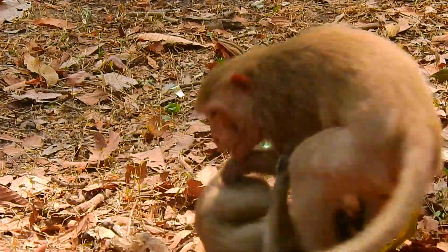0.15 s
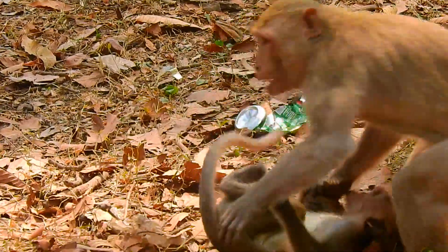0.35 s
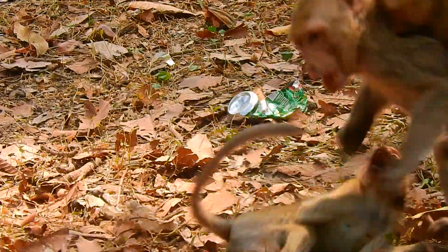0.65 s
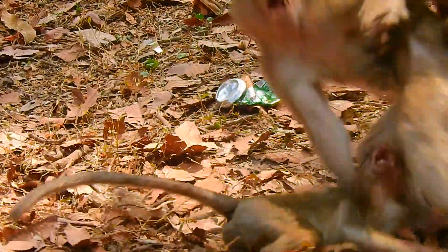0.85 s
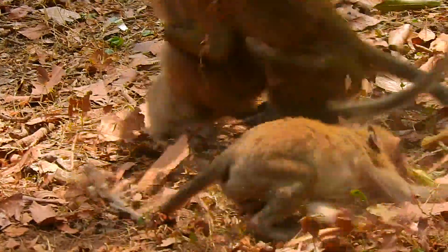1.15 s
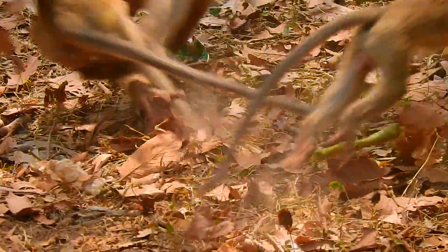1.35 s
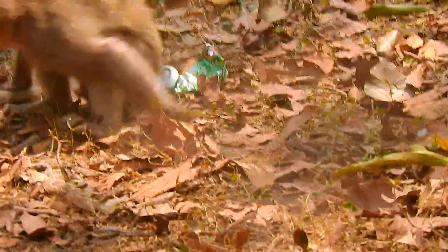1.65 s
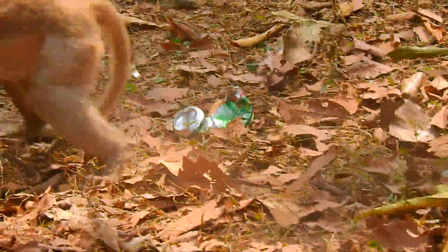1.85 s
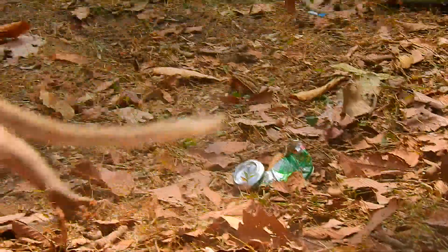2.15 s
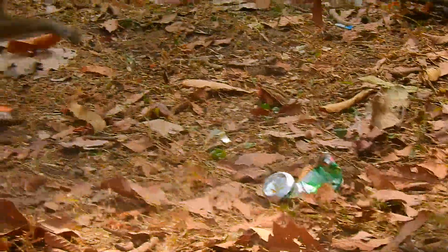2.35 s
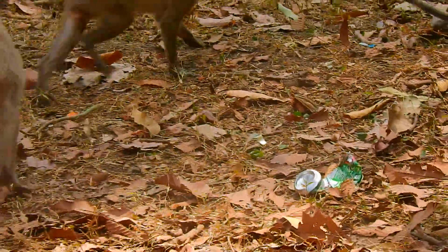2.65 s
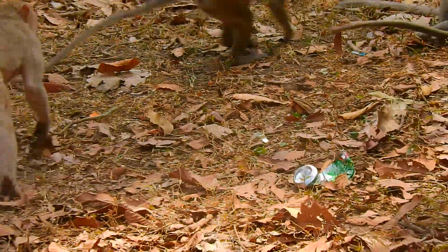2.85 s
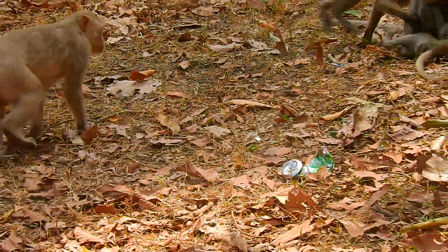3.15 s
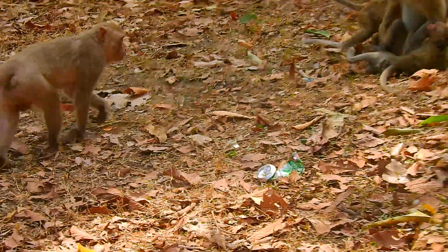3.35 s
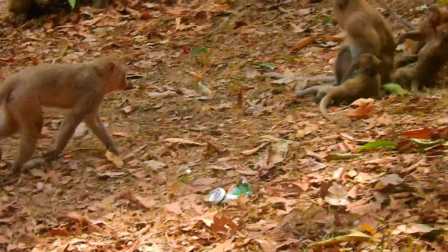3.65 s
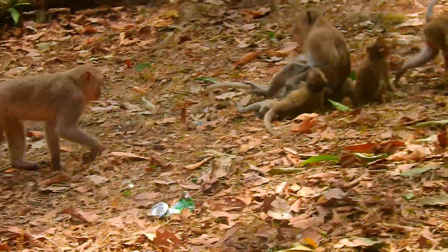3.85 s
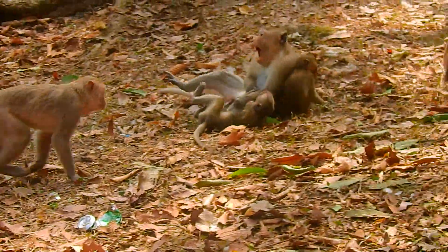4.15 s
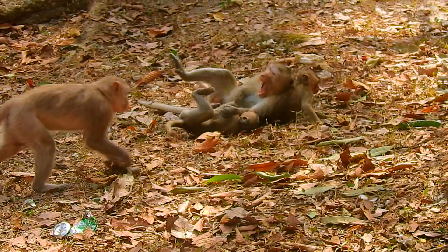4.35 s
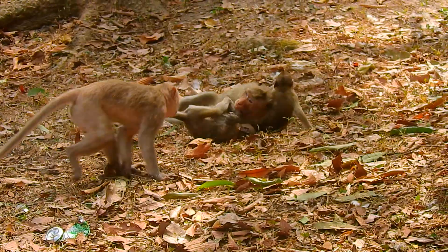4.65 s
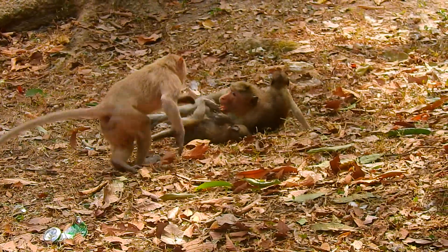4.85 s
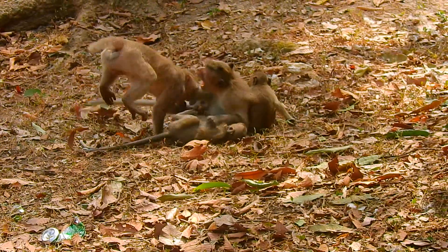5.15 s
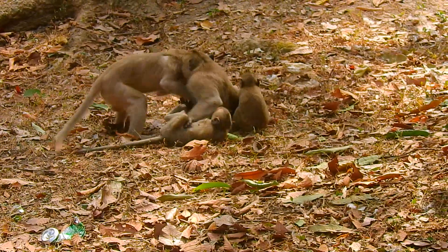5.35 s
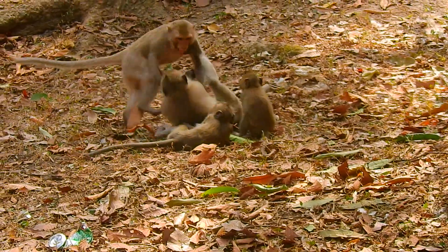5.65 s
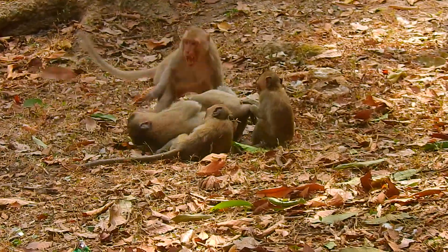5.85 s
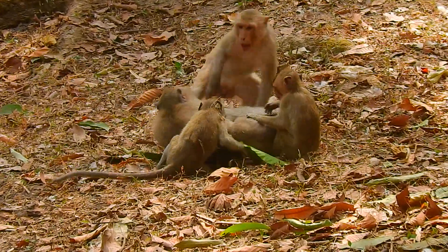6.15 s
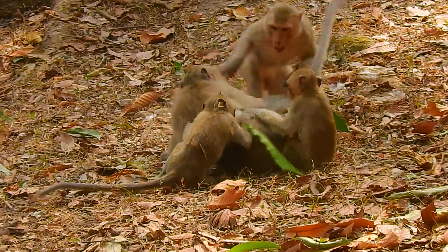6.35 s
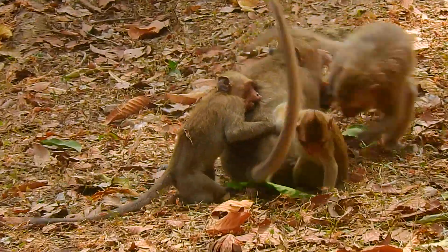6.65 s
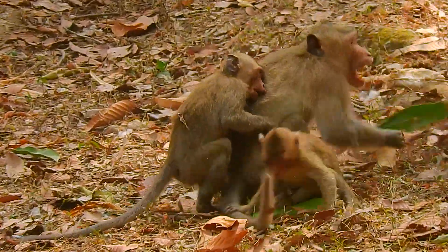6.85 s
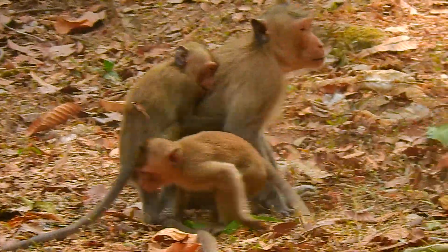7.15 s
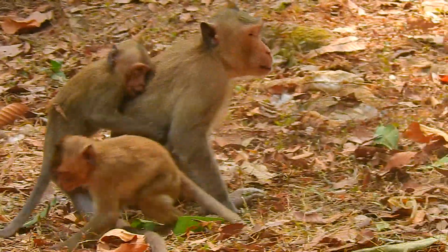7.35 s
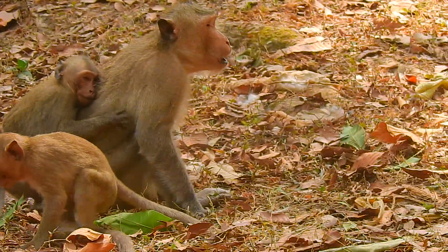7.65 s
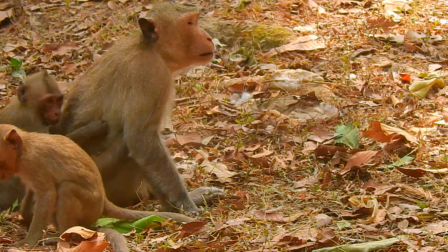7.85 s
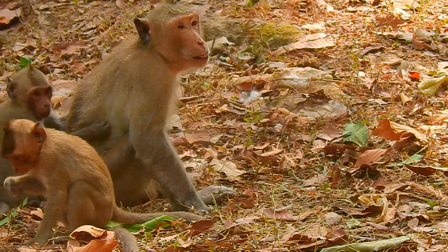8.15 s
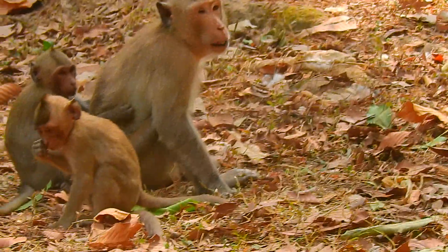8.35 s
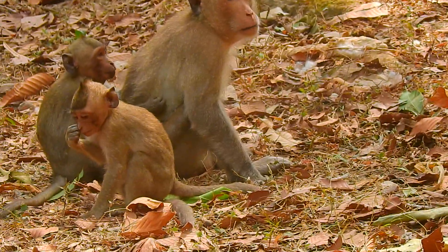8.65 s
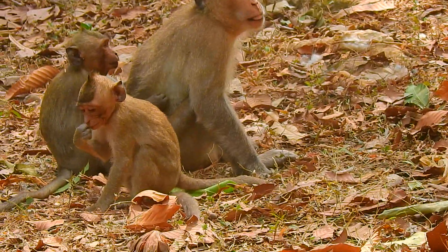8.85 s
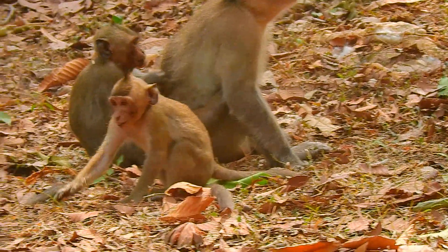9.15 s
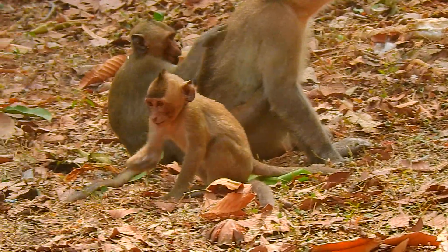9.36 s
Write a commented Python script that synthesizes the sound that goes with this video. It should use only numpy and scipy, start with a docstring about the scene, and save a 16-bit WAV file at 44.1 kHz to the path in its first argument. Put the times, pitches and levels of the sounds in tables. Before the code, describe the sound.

A loud steady cicada chorus fills dry woodland while monkeys scuffle in dead leaves, then a distant motorbike blips and a nearer cicada throbs.

```python
"""A cicada chorus drones in dry woodland: tymbal clicks of many singers, blurred and coloured.
A nearer singer, an amplitude-modulated buzz, joins about halfway and throbs ever quicker.
Monkeys tumble in dead leaves (noise bursts and grains); a far motorbike blips its throttle (pulses
through exhaust resonances) beside an idling engine (harmonics) and road noise. The hand-held camera
adds lever clicks, a zoom-motor whine and a treble path that arrives late."""
import sys
import numpy as np
from scipy import signal
from scipy.fft import rfft, irfft
from scipy.io import wavfile
from scipy.ndimage import uniform_filter1d

SR = 44100
rng = np.random.default_rng(int(sys.argv[2]) if len(sys.argv) > 2 else 0)


def to_wav(s):
    """Save 16-bit WAV."""
    ch = np.atleast_2d(s).T  # columns
    pcm = np.round(np.clip(ch, -1, 1) * 32767)  # PCM
    wavfile.write(sys.argv[1], SR, pcm.astype(np.int16))


N = 419832
T = np.arange(N) / SR
HZ = np.fft.rfftfreq(N, 1 / SR)


# Levels of the low-voiced and high-voiced singers: time_s, low_db, high_db
CHORUS_LEVELS = [(0, -25.5, -22), (1.2, -25.5, -23), (3, -25.5, -24), (4.3, -25.5, -23.5),
                 (5.4, -25, -23.5), (7.4, -25, -22.5), (9.52, -25.5, -22.5)]
# Spectrum of the song common to both ears: frequency_hz, density_db (relative, per Hz)
SONG_SPECTRUM = [(1250, -33.5), (1740, -7), (1900, -12), (2400, -22), (2920, -12.5), (3400, 2), (3750, -1),
                 (4050, -7.5), (4560, -8), (5160, -7), (7120, -6.5), (8400, -19), (9320, -30.5),
                 (15500, -55)]
# Spectrum of what differs left and right: frequency_hz, density_db (relative, per Hz)
SONG_SIDE_SPECTRUM = [(1300, -36), (1720, -12), (2070, -18), (2470, -28), (2800, -15.5), (3480, -3),
                      (4370, -9.5), (7040, -1), (8060, -8.5), (9420, -24.5), (13000, -35), (15500, -54)]
VOICE_SPLIT_HZ = 4300


def chorus():
    """Superposition: two bands of a blurred crowd of clicks swell and flicker independently."""
    mid = crowd(count=16) * colour(SONG_SPECTRUM)
    side = crowd(count=16) * colour(SONG_SIDE_SPECTRUM) * undb(-7.5)
    low_share = 1 / (1 + (HZ / VOICE_SPLIT_HZ) ** 12)
    out = 0
    for share, level_db in zip((low_share, 1 - low_share), columns(CHORUS_LEVELS)):
        mid_band, side_band = irfft(mid * share, N), irfft(side * share, N)
        flicker_db = .3 * walk(8.0) + .5 * walk(18.0)
        ears = np.array([mid_band + side_band, mid_band - side_band]) / np.std(mid_band)
        out = out + undb(level_db + flicker_db) * ears
    return out


def crowd(count):
    """Multiple scattering: trunks and leaves blur the uneven tymbal clicks; returns a spectrum."""
    clicks = np.zeros(N)
    for click_hz in rng.uniform(190, 330, count):
        intervals = SR / click_hz * (1 + .15 * rng.standard_normal(N // 120))
        at = np.cumsum(intervals).astype(int)
        clicks[at[at < N]] += rng.choice([-1, 1])
    blur = rng.standard_normal(N) * np.exp(-T / .5)
    # only the phase of the decaying noise is used, so the magnitudes stay those of the clicks
    return rfft(clicks) * np.exp(1j * np.angle(rfft(blur)))


# Body resonances of the near singer: frequency_hz, width_hz, level_db
SINGER_MODES = [(5200, 1300, -8), (6500, 1100, 0), (7300, 1100, -2), (8050, 1000, -4), (9600, 1000, -22),
                (11300, 1200, -28), (13000, 1000, -33), (14500, 1200, -41)]
# one throb peaks at THROB_S; the rate of throbs there, and how steadily it quickens
THROB_S, THROB_HZ, QUICKEN_HZ_PER_S = 4.767, 5.03, .575
THROB_SCATTER_DB = .7
# base level before the throb acts on it; the song starts below it and warms up
SINGER_START_S, SINGER_DB, START_BELOW_DB, WARM_UP_S = 4.25, -30, 16, 0.48


def singer():
    """Amplitude modulation: a click buzz swells once a throb as the abdomen pumps, ever quicker."""
    since = T - THROB_S
    throbs = THROB_HZ * since + QUICKEN_HZ_PER_S * since ** 2 / 2
    swell = (.5 + .5 * np.cos(2 * np.pi * throbs)) ** 2.2
    sung_s = np.clip(T - SINGER_START_S, 0, None)
    level_db = SINGER_DB - START_BELOW_DB * np.exp(-sung_s / WARM_UP_S) + THROB_SCATTER_DB * walk(6.0)
    gain = undb(level_db) * (0.32 + 1.55 * swell) * np.clip(sung_s / .2, 0, 1)
    click_turns = np.cumsum(262 * (1 + .03 * walk(3.0))) / SR  # about 262 clicks a second
    click_gate = 0.59 + np.exp(-(click_turns % 1) / .3)
    body = resonances(SINGER_MODES, order=3)
    # each click is a rattle of ribs; scattering makes it differ between the ears
    both, left, right = (unit(through(click_gate * rng.standard_normal(N), body)) for _ in range(3))
    return gain * (.7 * both + .7 * np.array([left, right]))


# Paws and bodies landing in leaves: start_s, peak_db, pitch_hz, crackle_peak_db
LANDINGS = [(0.247, -35, 1010, -35), (0.284, -30.5, 1080, -33), (0.529, -34, 735, -29),
            (0.636, -26.5, 800, -26), (0.724, -32, 1000, -25), (0.859, -34, 956, -32),
            (0.927, -28, 929, -39), (0.978, -35, 501, -31), (1.19, -30, 1170, -24), (1.33, -34, 727, -37),
            (1.408, -20, 1150, -30), (1.443, -32, 1240, -26), (1.549, -22, 1220, -32),
            (1.597, -36, 624, -34), (1.695, -39, 560, -23), (5.242, -35.5, 1300, -41),
            (7.259, -33, 1300, -40), (8.297, -38, 880, -41), (8.376, -36, 530, -40), (8.535, -36, 859, -40),
            (9.384, -34, 1090, -40)]
# Leaves shuffled as the monkeys tumble and run off: time_s, level_db
RUSTLE_LEVELS = [(0, -55), (.3, -42), (1.8, -44.5), (2.3, -48), (2.8, -57)]
# Spectrum of crushed leaf: frequency_hz, density_db (relative, per Hz)
LEAF_SPECTRUM = [(300, -22), (600, -3.5), (1200, -8), (4000, -5), (9000, -2), (15000, -31)]
PAW_S = 0.034  # time for a landing to fall 20 dB


def monkeys():
    """Impact and granular noise: dull landings with a crackle on top, over grains of crushed leaf."""
    landings = np.zeros(N)
    for start_s, peak_db, pitch_hz, crackle_db in LANDINGS:
        add(landings, start_s, peak_db, pitch_hz / 1.71, pitch_hz * 1.72, PAW_S)
        add(landings, start_s, crackle_db, 5000, 10500, PAW_S)
    present = rng.random(N) < .05
    grain_db = 2.5 * rng.exponential(size=N) + 3.5 * walk(14.0)
    grains = rng.standard_normal((2, N)) * present * undb(grain_db)
    shared = 3.0 * grains.sum(axis=0)
    leaves = [unit(through(ear + shared, colour(LEAF_SPECTRUM))) for ear in grains]
    rustle_db = np.interp(T, *np.transpose(RUSTLE_LEVELS), right=-120)
    return landings + np.array(leaves) * undb(rustle_db)


# Exhaust resonances, throttle shut: frequency_hz, width_hz, level_db
SHUT_MODES = [(106.3, 101, 0), (210, 90, -33)]
# Exhaust resonances, throttle open: frequency_hz, width_hz, level_db
OPEN_MODES = [(80, 50, -12), (140, 95, 0), (230, 80, -12), (300, 70, -20)]
# Motorbike blips: first_firing_s, end_s
BLIP_TIMES = [(3.266, 3.9), (4.896, 5.52), (5.84, 7.6), (7.657, 8.75)]
# Strength of a fast firing in each blip: level_db
BLIP_LEVELS = [-23, -24.5, -24, -24]
TICK_OVER_HZ = 13  # firing rate with the throttle shut
SLOW_LOSS_DB, SLOW_SPAN_HZ = 8, 1.9  # firings weaken near tick-over


def motorbike():
    """Source and filter: a pulse per firing rings the exhaust, deeper when the throttle shuts."""
    shut, wide = 0, 0
    for (first_s, end_s), blip_db in zip(BLIP_TIMES, BLIP_LEVELS):
        firing_hz, opening = revs(first_s, end_s)
        # the count starts just short of a whole number, so the first firing comes at once
        turns = np.cumsum(firing_hz * (T >= first_s - .01)) / SR + .999
        level_db = blip_db - SLOW_LOSS_DB * np.exp(-(firing_hz - TICK_OVER_HZ) / SLOW_SPAN_HZ)
        fired = pulses(turns, scatter_db=1.0) * undb(level_db) * inside(first_s, end_s, fade_s=0.089)
        shut = shut + fired * (1 - opening)
        wide = wide + fired * opening
    out = 0
    for fired, modes in ((shut, SHUT_MODES), (wide, OPEN_MODES)):
        pipe = resonances(modes, order=3)
        out = out + through(fired, pipe) / np.abs(irfft(pipe, N)).max()
    return out


# Twists of the throttle: time_s, firing_rate_hz (that the engine then heads for)
THROTTLE_TWISTS = [(3.238, 31.4), (3.39, 18.15), (3.59, 14.26), (4.836, 17.54), (5.819, 23.8),
                   (6.151, 27.9), (6.877, 29.17), (7.047, 11.8), (7.731, 30.06), (8.178, 12.14)]
# the exhaust sounds wide open OPEN_SPAN_HZ over tick-over; each lag is applied twice
FLYWHEEL_S, OPEN_SPAN_HZ, GAS_S = .101, 12, 0.033


def revs(first_s, end_s):
    """Inertia: firing rate and exhaust opening (0-1) of a blip lag the twist; open if fast and fed."""
    aim_hz = np.full(N, float(TICK_OVER_HZ))
    for twist_s, target_hz in THROTTLE_TWISTS:
        if first_s - FLYWHEEL_S < twist_s < end_s:
            aim_hz[T >= twist_s] = target_hz
    firing_hz = lagged(aim_hz, FLYWHEEL_S)
    fed_hz = np.minimum(firing_hz, lagged(aim_hz, GAS_S))
    return firing_hz, np.clip((fed_hz - TICK_OVER_HZ) / OPEN_SPAN_HZ, 0, 1)


def lagged(aim_hz, lag_s):
    """First-order relaxation, twice over: follows a firing rate from tick-over."""
    keep = np.exp(-1 / (lag_s * SR))
    pole = [1, -keep]
    rise_hz = signal.lfilter([(1 - keep) ** 2], np.convolve(pole, pole), aim_hz - TICK_OVER_HZ)
    return TICK_OVER_HZ + rise_hz


# Zoom motor, one curve a run: time_s, pitch_hz
ZOOM_RUNS = [
    [(2.5, 825), (2.6, 940), (2.82, 938), (2.9, 975), (3.03, 935), (3.3, 950), (3.48, 967), (3.52, 920)],
    [(6.02, 915), (6.13, 925), (6.2, 978), (6.43, 930), (6.62, 930), (6.775, 983), (6.8, 915), (7.09, 946)],
]
# Level of each run once up to speed: level_db
ZOOM_LEVELS = [-49.5, -53.5]
# Jolts after which the motor hunts about its speed: start_s, swing_hz, length_s
MOTOR_JOLTS = [(2.583, 65, .25), (3.03, 60, .17)]
HUNT_HZ, HUNT_DECAY_S = 14.2, .4
SPIN_UP_S = .14  # time for a rise of 1 in gain; the gain is 0.34 at the start of a run


def zoom():
    """Frequency modulation: a near-sine whine whose pitch rings as a damped swing after each jolt."""
    hunt_hz = 0
    for jolt_s, swing_hz, length_s in MOTOR_JOLTS:
        swing = -swing_hz * np.cos(2 * np.pi * HUNT_HZ * (T - jolt_s))
        decay = np.exp(-np.abs(T - jolt_s) / HUNT_DECAY_S)
        hunt_hz = hunt_hz + swing * decay * (T > jolt_s) * (T < jolt_s + length_s)
    out = 0
    for run, level_db in zip(ZOOM_RUNS, ZOOM_LEVELS):
        start_s, end_s = run[0][0], run[-1][0]
        pitch_hz = columns(run)[0] + hunt_hz + 10.5 * walk(40.0)
        whine = np.sqrt(2) * np.sin(2 * np.pi * np.cumsum(pitch_hz) / SR)
        spin_up = np.clip((T - start_s) / SPIN_UP_S + 0.34, 0, 1)
        gain = undb(level_db + 1.7 * walk(22.0)) * inside(start_s, end_s, fade_s=.03) * spin_up
        out = out + gain * whine
    return out


# Knocks of finger and lever on the camera shell: start_s, peak_db, pitch_hz
SHELL_KNOCKS = [(2.366, -29, 584), (2.42, -26, 999), (3.366, -35, 960), (3.657, -32, 710),
                (3.75, -33.5, 888), (3.795, -29, 800), (5.712, -38, 673), (5.734, -32, 877),
                (5.774, -37, 571), (6.54, -32.5, 931), (6.98, -27, 1250), (7.04, -37, 942)]
KNOCK_S = 0.038  # time for a knock to fall 20 dB


def knocks():
    """Damped impact response: the plastic shell answers each touch with a short dull tick."""
    out = np.zeros(N)
    for start_s, peak_db, pitch_hz in SHELL_KNOCKS:
        add(out, start_s, peak_db, pitch_hz / 1.6, pitch_hz * 1.58, KNOCK_S)
    return out


# Idling engine, uneven and fainter by the end: time_s, level_db
IDLING_LEVELS = [(0, -41), (1.3, -43.5), (2.25, -41.5), (2.7, -49.5), (4.3, -44), (5.6, -46), (7.5, -52),
                 (8.5, -46.5), (9.52, -50.5)]
# Lines of the idling engine: multiple (of the firing rate), level_db (relative)
IDLE_LINES = [(2, -4), (3, -7), (4, 0), (5, -7), (7, -10), (10, -17)]
# Distant road: time_s, rumble_db, tyre_wash_db
ROAD_LEVELS = [(0, -41.5, -44.5), (1.6, -42.5, -48), (2.7, -41.5, -48), (4.9, -41, -53), (5.7, -40, -49.5),
               (7.3, -39, -50.5), (9.52, -44.5, -59)]
# Spectrum of the road rumble: frequency_hz, density_db (relative, per Hz)
RUMBLE_SPECTRUM = [(25, -24), (45, -30), (65, 0), (110, 4), (170, -0.5), (240, -9.5), (400, -51)]
# Spectrum of the tyre wash: frequency_hz, density_db (relative, per Hz)
WASH_SPECTRUM = [(120, -18), (250, 0.5), (420, -4), (520, -8.5), (900, -6), (1400, -8.5), (3000, -40),
                 (9000, -60)]
IDLE_HZ = 40.4  # mean firing rate
HUM_HZ, HUM_DB = 49.7, -46


def traffic():
    """Harmonic series and filtered noise: wavering engine lines, a blurred hum, rumble, tyre wash."""
    engine_db = columns(IDLING_LEVELS)[0]
    road_db, wash_db = columns(ROAD_LEVELS)
    turns = np.cumsum(IDLE_HZ * (1 + 0.00384 * walk(1.494))) / SR
    dull_db = 0.11 * (engine_db - engine_db.max())  # the fainter, the duller: loss per multiple
    engine = 0
    for multiple, line_db in IDLE_LINES:
        line = np.sin(2 * np.pi * (multiple * turns + rng.random()))
        engine = engine + undb(line_db + multiple * dull_db + 2.5 * walk(4.0)) * line
    hum = undb(HUM_DB) * spread(resonances([(HUM_HZ, 7, 0)], order=2), .03)
    road = undb(road_db + 2.14 * walk(8.1)) * spread(colour(RUMBLE_SPECTRUM), 0.096)
    wash = undb(wash_db + 2.0 * walk(5.5)) * spread(colour(WASH_SPECTRUM), 0.24)
    return unit(engine) * undb(engine_db) + hum + road + wash


def undb(db):
    """Decibel law: amplitude ratio of a level."""
    return 10 ** (np.asarray(db) / 20)


def unit(x):
    """Normalisation to an rms amplitude of 1."""
    return x / np.sqrt(np.mean(x ** 2))


def columns(table):
    """Linear interpolation: each column of a curve, sample by sample."""
    times, *rest = np.transpose(table)
    return [np.interp(T, times, column) for column in rest]


def colour(points):
    """Spectral shaping: gain at every frequency, interpolated over log frequency."""
    hz, db = np.transpose(points)
    return undb(np.interp(np.log(HZ + 1), np.log(hz), db))


def resonances(modes, order):
    """Modal summation: response of parallel resonances, each applied order times."""
    f = HZ + 1
    return sum(undb(db) / (1 + 1j * (f - hz ** 2 / f) / width) ** order for hz, width, db in modes)


def through(x, response):
    """Linear filtering: multiplication of spectra."""
    return irfft(rfft(x) * response, N)


def walk(rate):
    """Random modulation: levels held 1 / rate s and smoothed twice; spread near 1."""
    hold = int(SR / rate)
    steps = np.repeat(rng.standard_normal(N // hold + 1), hold)
    return 1.3 * uniform_filter1d(uniform_filter1d(steps, hold), hold)[:N]


def pulses(turns, scatter_db):
    """Impulse train: a click of random size wherever the cycle count passes a whole number."""
    out = np.zeros(N)
    at = np.flatnonzero(np.diff(np.floor(turns)))
    out[at] = undb(scatter_db * rng.standard_normal(N // 50)[:len(at)])
    return out


def inside(start_s, end_s, fade_s):
    """Gating: 1 from 10 ms before start to end, fading out beyond it."""
    return (T >= start_s - .01) * np.clip(1 + (end_s - T) / fade_s, 0, 1)


def spread(response, side_share):
    """Partial coherence: noise of one colour, a share of it opposite in the two ears."""
    mid, side = (through(rng.standard_normal(N), response) for _ in range(2))
    return np.array([mid + side_share * side, mid - side_share * side]) / np.std(mid)


def add(out, start_s, peak_db, low_hz, high_hz, length_s):
    """Exponential decay: adds a grainy band of noise that falls 20 dB in length_s."""
    t = np.arange(int(.12 * SR)) / SR
    band = signal.butter(3, [low_hz, high_hz], "band", fs=SR, output="sos")
    shape = np.minimum(t / .004, 1) * np.exp(-np.log(1000) * t / (3 * abs(length_s)))
    grain = np.repeat(rng.random(len(t) // 128 + 1), 128)[:len(t)]
    burst = signal.sosfilt(band, rng.standard_normal(len(t)) * shape * grain)
    first = int(start_s * SR)
    out[first:first + len(t)] += burst * undb(peak_db) / np.abs(burst).max()


def scene():
    """Superposition of all sources."""
    return chorus() + singer() + monkeys() + motorbike() + zoom() + knocks() + traffic()


LEFT_DB, BASS_LEFT_DB = 1.8, .4  # left over right, above 260 Hz and below 130 Hz
SPLIT_HZ, TREBLE_LAG_S = 4000, .010504
TOP_HZ = 15740


def record(dry):
    """Comb interference: the camera's treble path is late, so its overlap with the bass is combed."""
    bass = np.clip((SPLIT_HZ + 40 - HZ) / 60, 0, 1) / np.sqrt(1 + (HZ / 4100) ** 8)
    treble = np.exp(-2j * np.pi * HZ * TREBLE_LAG_S) / np.sqrt(1 + (3940 / (HZ + 1)) ** 30)
    # the left port faces the sound better, except for the long waves
    left_db = np.interp(HZ, [130, 260], [BASS_LEFT_DB, LEFT_DB])
    ports = undb(np.array([left_db, -left_db]) / 2)
    both = irfft(rfft(dry) * (bass + treble) * ports, N)
    mic = signal.sosfilt(signal.butter(2, 40, "high", fs=SR, output="sos"), both)
    return signal.sosfilt(signal.ellip(14, .2, 70, TOP_HZ, fs=SR, output="sos"), mic)


dry = scene()
out = record(dry)
to_wav(out)
```